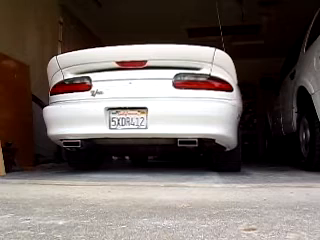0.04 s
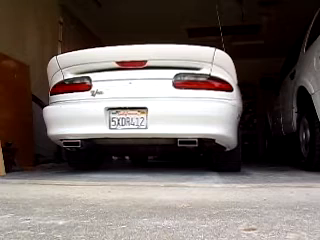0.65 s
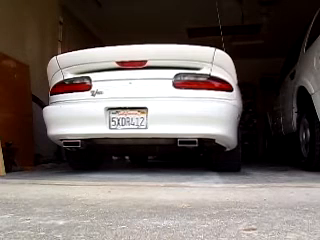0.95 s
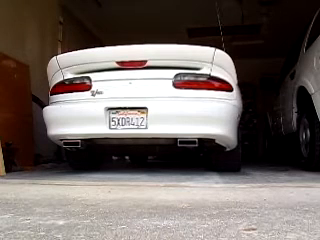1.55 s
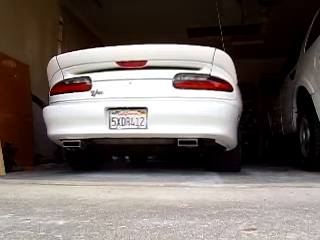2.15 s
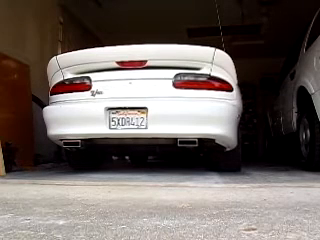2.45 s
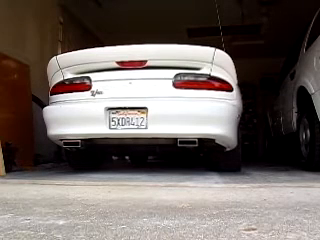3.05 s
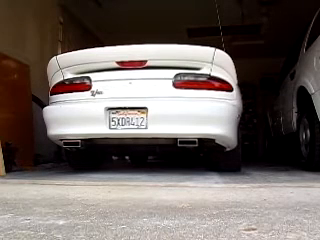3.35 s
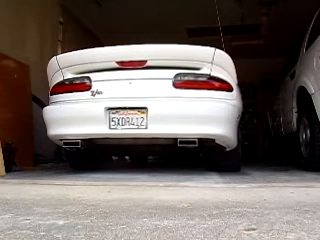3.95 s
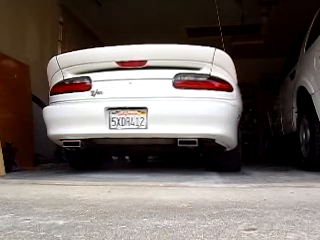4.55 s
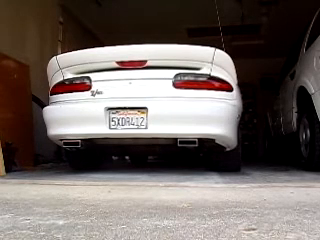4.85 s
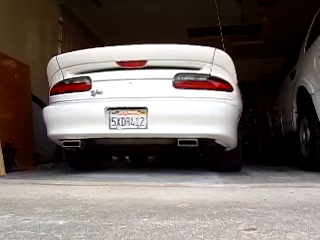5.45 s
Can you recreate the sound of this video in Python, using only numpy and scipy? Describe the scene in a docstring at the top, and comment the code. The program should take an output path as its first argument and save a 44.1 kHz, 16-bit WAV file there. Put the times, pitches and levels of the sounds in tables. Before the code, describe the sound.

A big car engine idles in a garage with a deep, throbbing exhaust burble, slowly settling into a lower lope.

```python
"""A V8 idles in an open garage, heard from behind its two tailpipes. Each bank fires unevenly into its
own pipe, so pipe and garage resonances throb once an engine cycle; the loudest throbs overload the mic.
Gas rasps after every firing, and the engine bay hisses, ticks and whines faintly. Two soft swishes and
a squeak pass early on. From about 1.7 s the throttle eases and rasp and hiss fall back. The idle sinks
slowly throughout: smoothest near 3 s, it ends in a deep lope."""
import sys
import numpy as np
from scipy import signal
from scipy.fft import rfft, irfft, next_fast_len
from scipy.io import wavfile
from scipy.ndimage import uniform_filter1d

SR = 44100
rng = np.random.default_rng(int(sys.argv[2]) if len(sys.argv) > 2 else 0)


def file_out(sig):
    """Save sig as 16-bit WAV at sys.argv[1]."""
    # one column per channel
    cols = np.atleast_2d(sig).T
    # limit, then scale
    lim = np.clip(cols, -1, 1)
    pcm = np.round(lim * 32767).astype(np.int16)
    wavfile.write(sys.argv[1], SR, pcm)


N = 247401
TIME = np.arange(N) / SR

# the cylinders in firing order: (bank [0 or 1], timing offset at the tailpipe [ms], strength [dB])
CYLINDERS = [(0, -2.5, 2.5), (1, 0.84, 2), (1, 0.89, 8.5), (0, -1.4, 2), (1, 3, -4), (0, -0.44, 2),
             (0, -1.27, -5), (1, 3, -5.5)]


def undb(db):
    """Decibels to gain."""
    return 10 ** (np.asarray(db) / 20)


def unit(x):
    """Scale to an rms of one."""
    return x / np.sqrt(np.mean(x ** 2))


def wander(rate_hz):
    """A smooth random drift with a spread near one."""
    return 1.2 * np.interp(TIME * rate_hz, np.arange(N), rng.standard_normal(N))


def swell(peak_s, width_s):
    """A bell-shaped rise and fall."""
    return np.exp(-((TIME - peak_s) / width_s) ** 2 / 2)


def noise(colour):
    """Noise shaped by an EQ curve of (frequency [Hz], level [dB]) points."""
    hz, db = np.transpose(colour)
    f = np.fft.rfftfreq(N, 1 / SR) + 1
    eq = undb(np.interp(np.log(f), np.log(hz), db))
    bass_rolloff = np.minimum(f / hz[0], 1) ** 2
    return unit(irfft(rfft(rng.standard_normal(N)) * eq * bass_rolloff, N))


def firings(fired, scatter_db=1.7, jitter_ms=0.2):
    """One pulse train per bank, timed by the running count `fired`; no two combustions are quite alike."""
    k = np.arange(int(fired[-1]))
    bank, offset_ms, db = np.array(CYLINDERS)[k % len(CYLINDERS)].T
    jitter, scatter = rng.standard_normal((len(k), 2)).T
    arrival_s = np.interp(k, fired, TIME) + (offset_ms + jitter_ms * jitter) / 1000
    at = np.clip(arrival_s * SR, 0, N - 1).astype(int)
    pulses = np.zeros((2, N))
    np.add.at(pulses, (bank.astype(int), at), undb(db + scatter_db * scatter))
    return pulses


def puffs(pulses, decay_s):
    """The flow that follows each pulse: a quick swell that dies away."""
    pole = np.exp(-1 / (decay_s * SR))
    return unit(signal.lfilter([1], [1, -2 * pole, pole ** 2], pulses))


def resonate(x, modes):
    """Ring a sound through steep-sided resonances: (frequency [Hz], half-width [Hz], level [dB])."""
    size = 2 * next_fast_len(N * 2 // 3)
    f = np.fft.rfftfreq(size, 1 / SR)
    power = sum(undb(db) ** 2 / (1 + ((f - hz) / width) ** 2) ** 2 for hz, width, db in modes)
    # fold the cepstrum so that the ring follows each hit, with no pre-ring
    cepstrum = irfft(np.log(power) / 2)
    cepstrum[1:size // 2] *= 2
    cepstrum[size // 2 + 1:] = 0
    return irfft(rfft(x, size) * np.exp(rfft(cepstrum)))[:N]


def wall_echoes(x):
    """A tailpipe's sound with its slap off the nearby walls."""
    # early reflections: (delay [ms], gain [linear])
    echoes = [(11.73, 0.42), (28.67, 0.29)]
    return x + sum(gain * np.interp(TIME - ms / 1000, TIME, x, left=0) for ms, gain in echoes)


def exhaust(pulses, turbulence_db=-25):
    """The boom: each bank's pulses, with a little turbulence, ring that bank's pipe."""
    # pipe and garage resonances: (frequency [Hz], half-width [Hz], bank 0 level [dB], bank 1 level [dB])
    resonances = [(46.7, 5.1, -20.5, -21), (75.8, 5.4, -22, -41.5), (128.7, 8.9, -35.5, -8),
                  (134.7, 3.9, -6, 1.5), (163.2, 6.73, -4, -4), (217.6, 14, -7, -15.5),
                  (258, 4.6, -14.5, -30), (273.33, 8.7, -1, -1.5), (293.5, 23, -12.5, -14),
                  (342.7, 4.93, -12.5, -6), (372.5, 5.3, -11, -42.5), (419.7, 8.5, -19.5, -22),
                  (480.7, 12.8, -14.5, -21), (569, 9.3, -22.5, -25.5), (608.4, 4.7, -23.5, -15),
                  (639, 12, -32, -31), (678, 20.5, -22.5, -29), (748.1, 5.1, -17.5, -41),
                  (840, 21, -33, -42), (986, 215, -41, -48)]
    tailpipes = []
    for bank, train in enumerate(pulses):
        swirl = train.std() * puffs(train, decay_s=0.0013) * rng.standard_normal(N)
        modes = np.array(resonances)[:, [0, 1, 2 + bank]]
        tailpipes.append(resonate(train + undb(turbulence_db) * swirl, modes))
    return unit(wall_echoes(tailpipes[0]) + tailpipes[1])


def lope(fired, depth_db, crest, sharpness=4):
    """Gain that surges once an engine cycle, at the fraction `crest` of the cycle."""
    angle = 2 * np.pi * (fired / len(CYLINDERS) - crest)
    return undb(depth_db * np.exp(sharpness * (np.cos(angle) - 1)))


def gas_rasp(pulses, steady=2.8):
    """Gas rasps out in puffs that the silencer evens out; the garage fills the gaps between them."""
    # colour of the rushing gas: (frequency [Hz], level [dB])
    colour = [(150, -26.5), (350, 0.5), (620, -1), (740, -2.5), (790, -12), (840, -0.5), (1000, -7.5),
              (1250, -10.5), (1500, -20.5), (2500, -24), (5000, -48)]
    flow = steady + puffs(np.sqrt(pulses.sum(0)), decay_s=0.0033)
    return unit(noise(colour) * flow)


def engine_bay(fired, tick_depth=0.25, tick_decay=0.11, flutter_db=1.0):
    """Belts and fan hiss, swelling once a cycle, and the valves tick with each firing."""
    # colour of the hiss as heard, with the recorder's notch at 8 kHz: (frequency [Hz], level [dB])
    colour = [(700, -16.5), (1500, -6), (2000, 0.5), (3200, 0.5), (4200, -6), (5000, -11), (5900, -18),
              (6600, -14), (7400, -10.5), (8000, -37.5), (9000, -20.5), (11000, -24), (13500, -33),
              (15500, -25)]
    ticks = 1 + tick_depth * np.exp(-(fired % 1) / tick_decay)  # decay in firing intervals
    hiss = noise(colour) * ticks * undb(flutter_db * wander(rate_hz=30))
    return unit(garage(hiss) * lope(fired, depth_db=2.0, crest=0.26, sharpness=1.9))


def garage(x, t60_s=0.43, wet=0.42):
    """Dense reflections off bare walls give the hiss a fine, hollow grain."""
    t = TIME[:SR // 2]
    tail = rng.standard_normal(len(t)) * undb(-60 * t / t60_s)
    return x + wet * signal.fftconvolve(x, tail / np.linalg.norm(tail))[:N]


def rough_tone(hz, width_hz, roughness=0.48):
    """A sine with a narrow skirt of noise."""
    angle = 2 * np.pi * hz * TIME
    wavering = (1 + roughness * wander(width_hz)) * np.sin(angle)
    return unit(wavering + roughness * wander(width_hz) * np.cos(angle))


def whines():
    """Faint, thin whines from the engine bay, switching in and out with short fades."""
    # high tones: (start [s], end [s], pitch [Hz], level [dB])
    tones = [(0, 5.7, 2716, -55), (0, 1.5, 6152, -62), (1.5, 5.7, 10632, -76), (1.5, 5.7, 12270, -66.5)]
    out = np.zeros(N)
    for start, end, hz, db in tones:
        gate = 1.0 * ((TIME >= start) & (TIME < end))
        fade = uniform_filter1d(gate, SR // 10)
        out += undb(db) * fade * rough_tone(hz, width_hz=hz * 0.011)
    return out


def swishes():
    """The hiss brightens softly for a moment, twice."""
    # colour of the swishes as heard, with the recorder's notch at 8 kHz: (frequency [Hz], level [dB])
    colour = [(3000, -7), (4200, 5), (5900, -9), (7300, 0.5), (8000, -18), (9000, -12), (11000, -27),
              (15000, -26)]
    # swells of hiss: (peak time [s], width [s], level [dB])
    swells = [(0.573, 0.035, -40.5), (1.15, 0.08, -40)]
    return noise(colour) * sum(undb(db) * swell(peak_s, width_s) for peak_s, width_s, db in swells)


def squeak():
    """One brief, grainy squeak."""
    return undb(-37) * swell(peak_s=1.045, width_s=0.02) * rough_tone(hz=3900, width_hz=260)


def throttle(middle_s=2.37, length_s=1.4):
    """The throttle eases once, a straight ramp from one to zero."""
    return np.clip(0.5 - (TIME - middle_s) / length_s, 0, 1)


def scene(smoothest_hz=78.83, tuned_hz=81.58, tuned_width_hz=3.2):
    """The crankshaft times the engine; its speed sets boom and lope, the throttle sets rasp and hiss."""
    # engine speed, sinking as the idle settles: (time [s], firing rate [Hz])
    idle_speed = [(0, 86.54), (.8, 84.4), (1.8, 81.28), (2.4, 79.84), (3.2, 78.27), (4.3, 74.6),
                  (4.8, 74.62), (5.61, 72.23)]
    firing_hz = np.interp(TIME, *np.transpose(idle_speed))
    fired = np.cumsum(firing_hz) / SR
    pulses = firings(fired)
    # away from the smoothest speed, the surge deepens and lands later in the cycle
    away_hz = np.abs(firing_hz - smoothest_hz)
    surge = lope(fired, depth_db=-0.6 + 0.7651 * away_hz, crest=0.25 + 0.032 * away_hz)
    # the exhaust booms most at its tuned firing rate
    tuned_boost_db = 3 * np.exp(-((firing_hz - tuned_hz) / tuned_width_hz) ** 2)
    boom = undb(-12.3 + tuned_boost_db) * unit(exhaust(pulses) * surge)
    rasp = undb(-29.5 + 4.5 * throttle()) * gas_rasp(pulses)
    bay = undb(-39.5 + 3.5 * throttle()) * engine_bay(fired)
    return (boom + rasp + bay + swishes() + squeak() + whines())[None]


def record(dry, low_cut_hz=36, high_cut_hz=15750):
    """The microphone loses the deepest bass; the recorder clips the tallest peaks and cuts the top."""
    low_cut = signal.butter(3, low_cut_hz, "high", fs=SR, output="sos")
    high_cut = signal.ellip(10, 0.1, 80, high_cut_hz, fs=SR, output="sos")
    heard = signal.sosfiltfilt(low_cut, dry, padtype="even", padlen=SR // 10)
    return signal.sosfilt(high_cut, np.clip(heard, -1, 1))


dry = scene()
out = record(dry)
file_out(out)
```